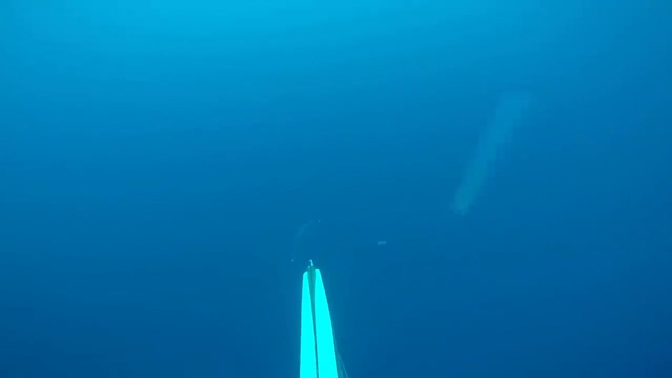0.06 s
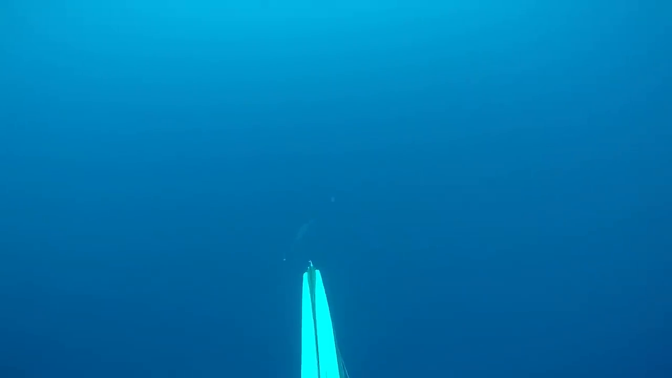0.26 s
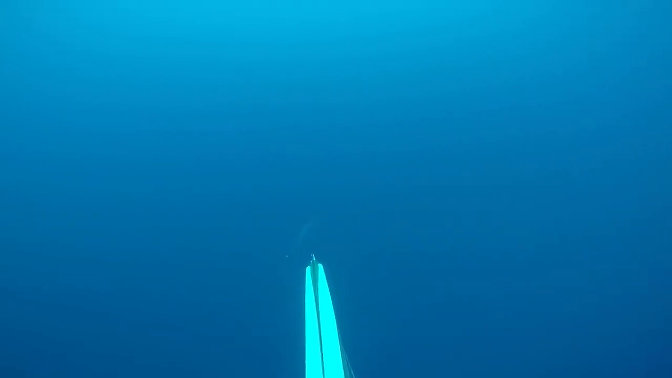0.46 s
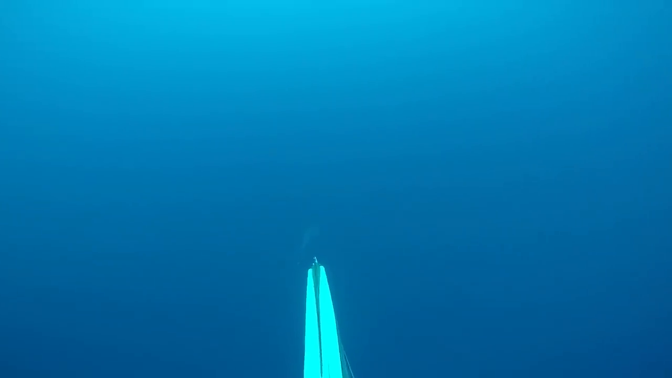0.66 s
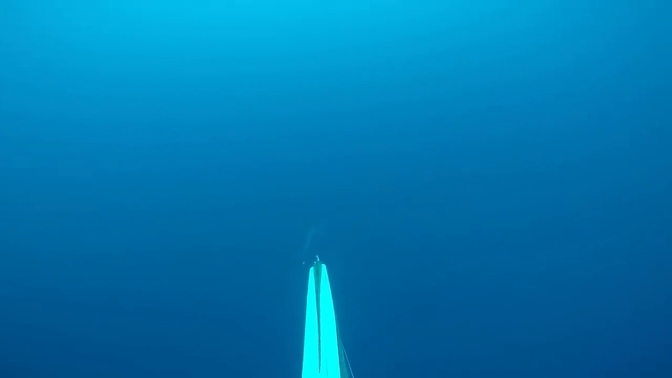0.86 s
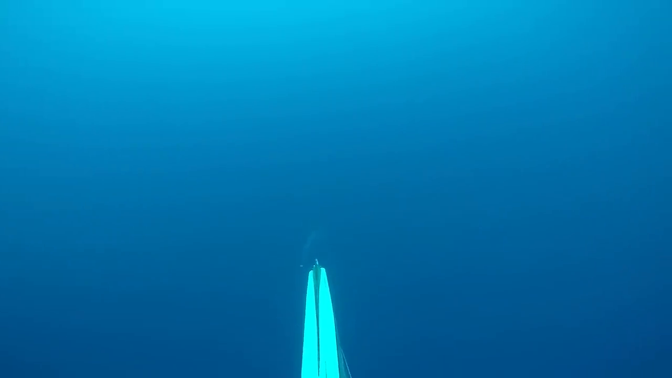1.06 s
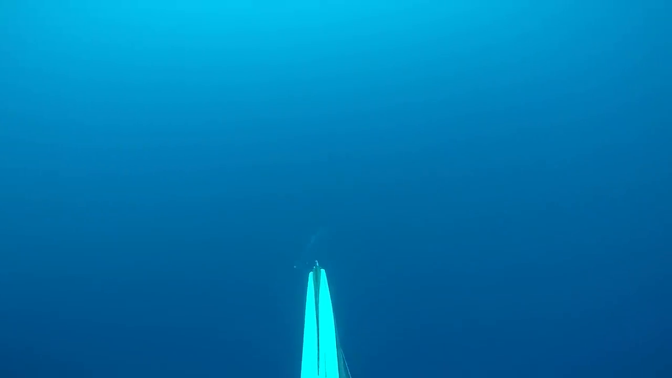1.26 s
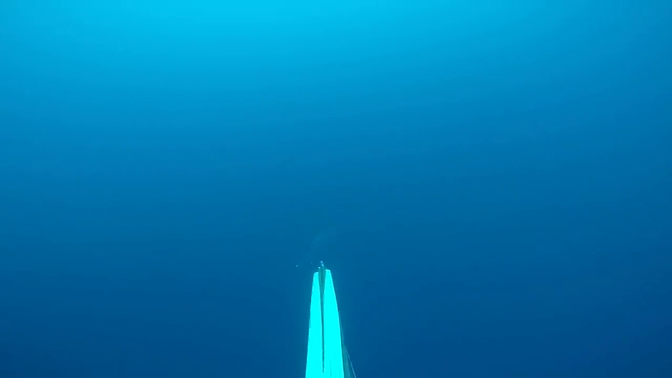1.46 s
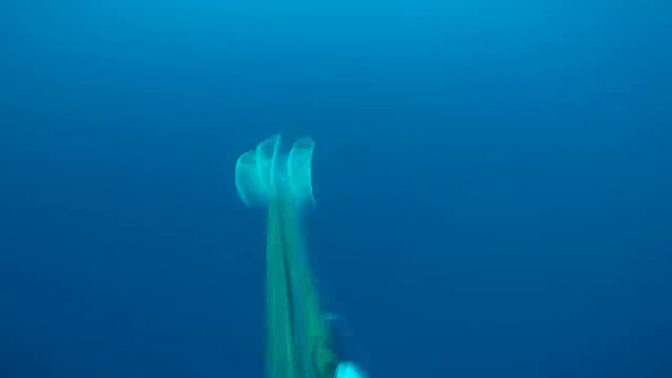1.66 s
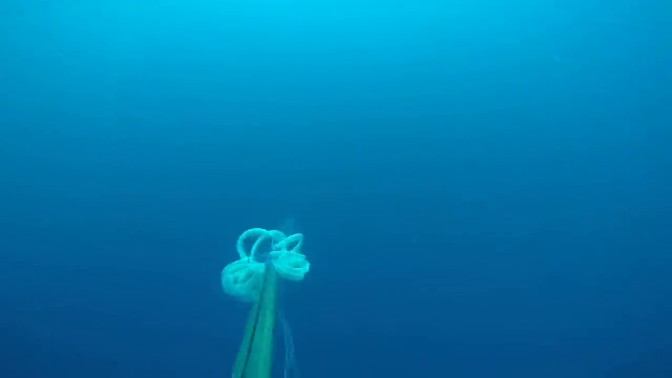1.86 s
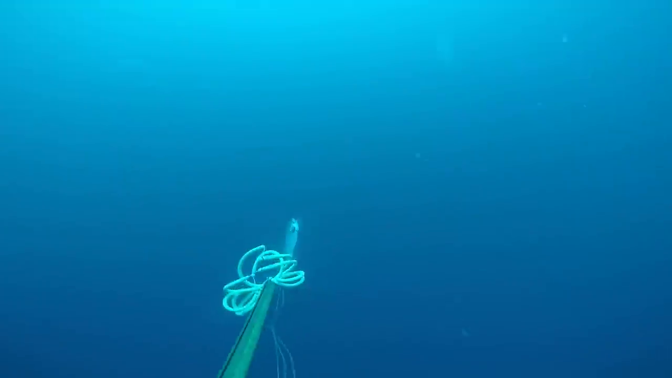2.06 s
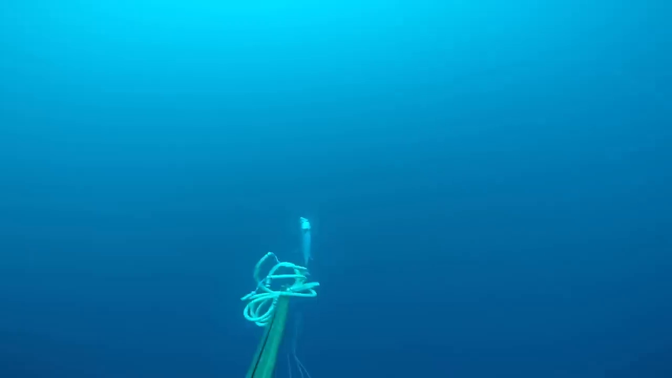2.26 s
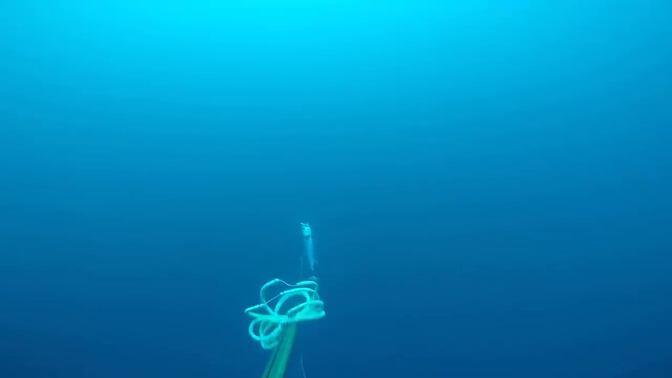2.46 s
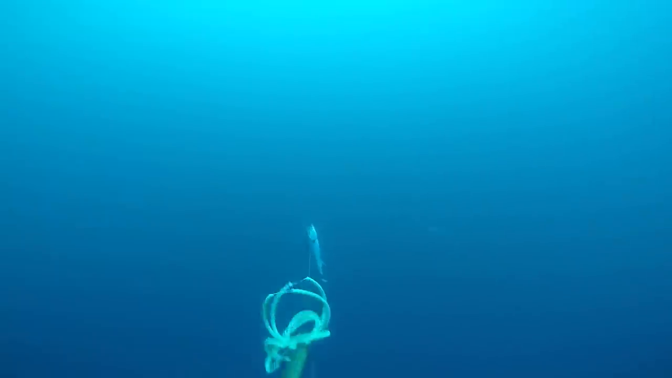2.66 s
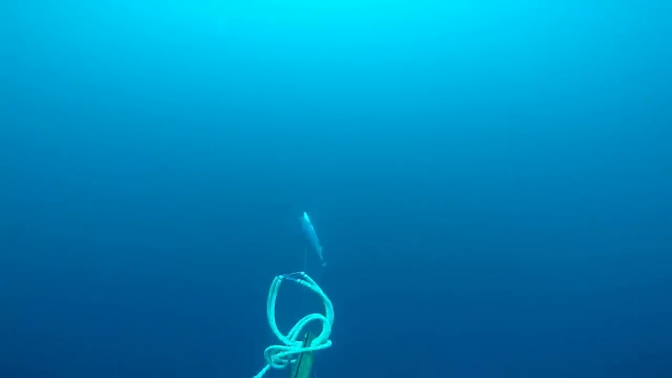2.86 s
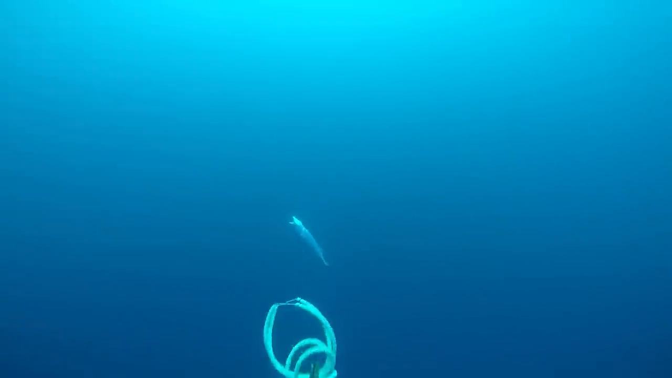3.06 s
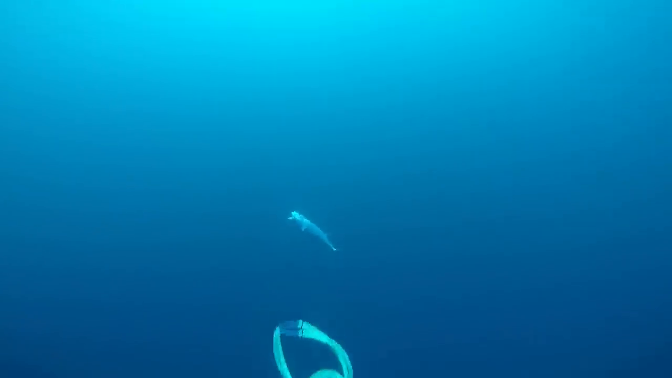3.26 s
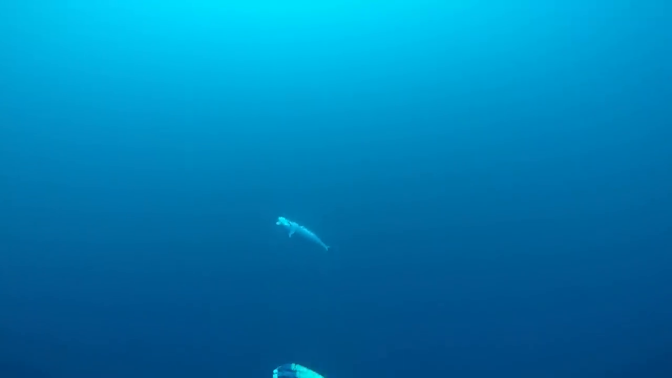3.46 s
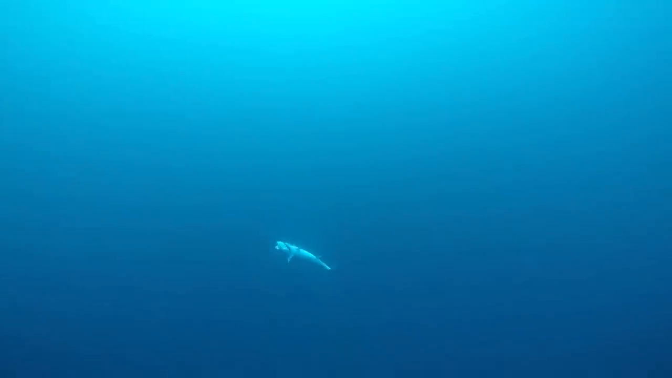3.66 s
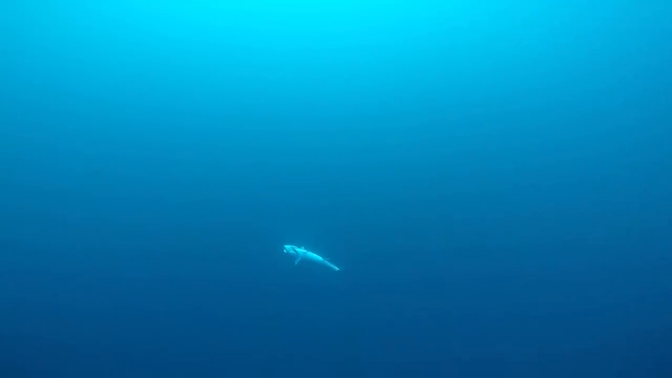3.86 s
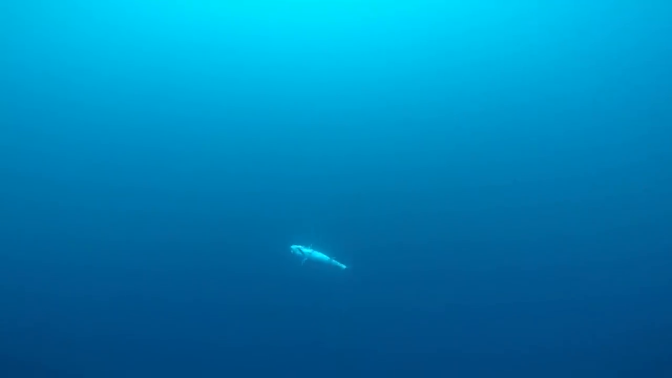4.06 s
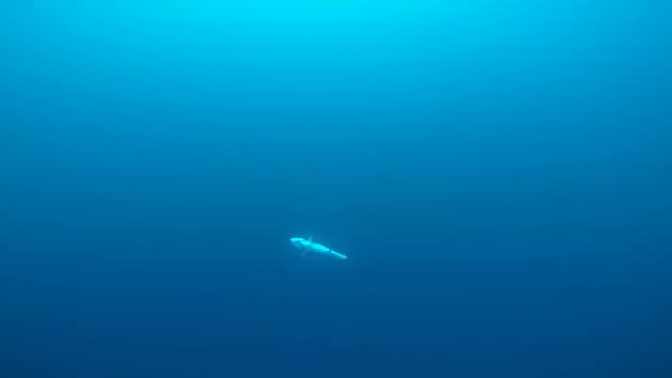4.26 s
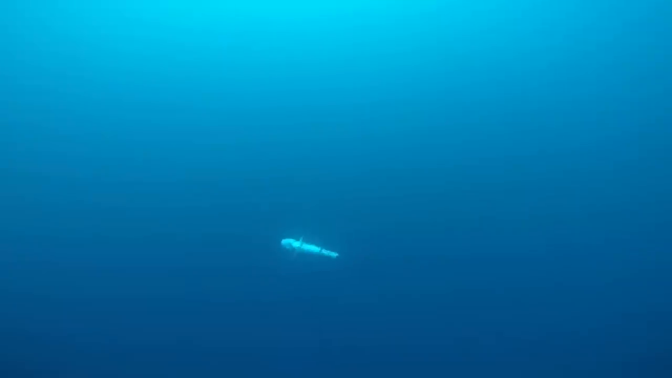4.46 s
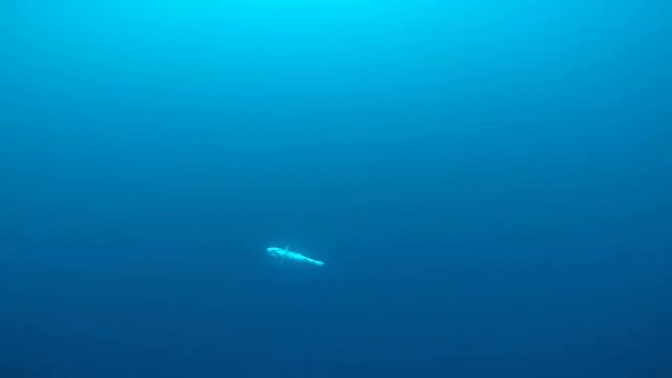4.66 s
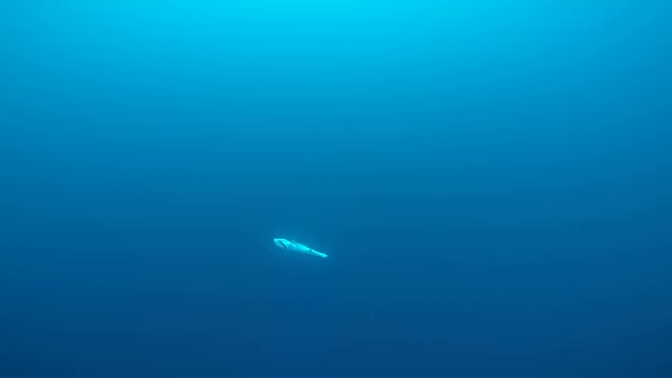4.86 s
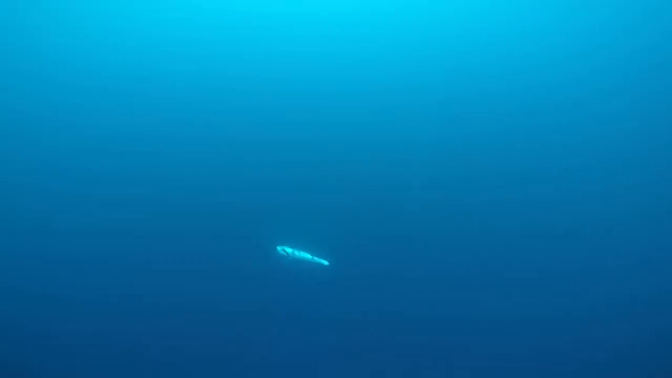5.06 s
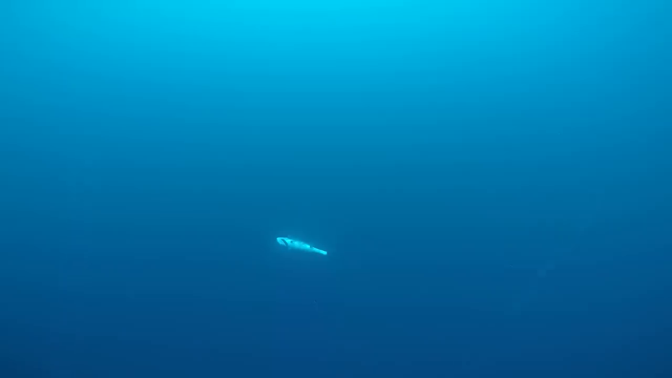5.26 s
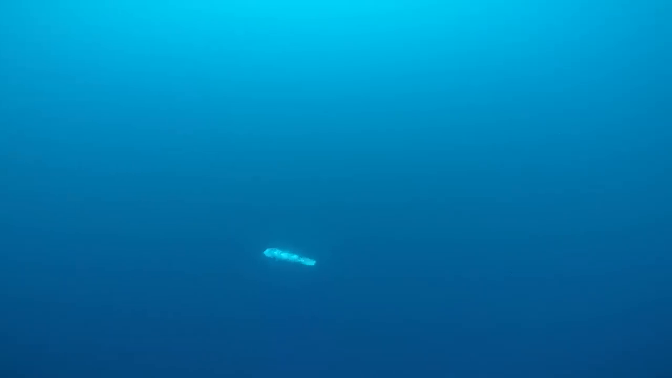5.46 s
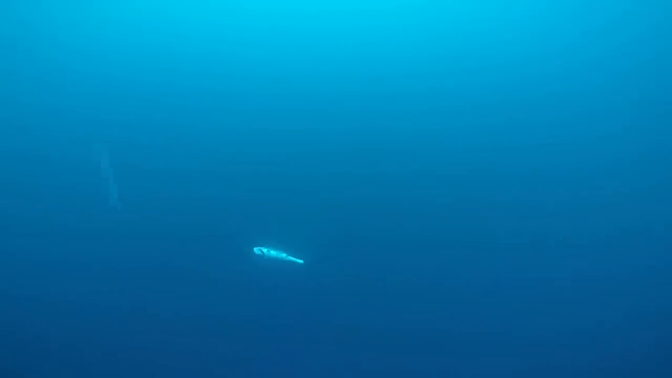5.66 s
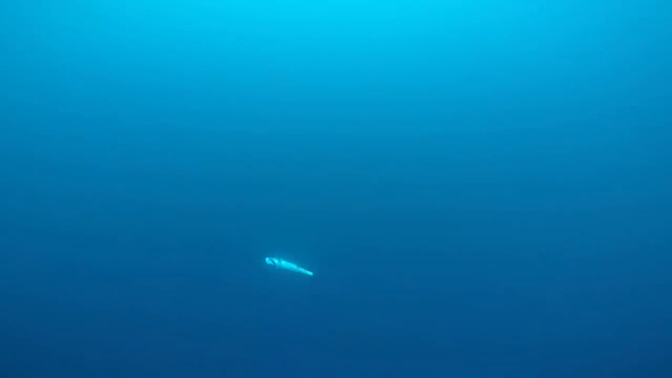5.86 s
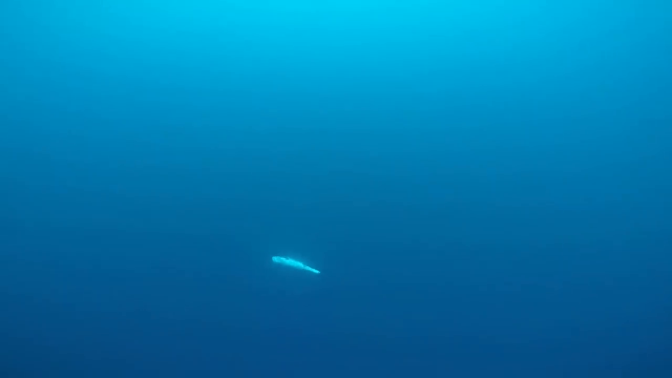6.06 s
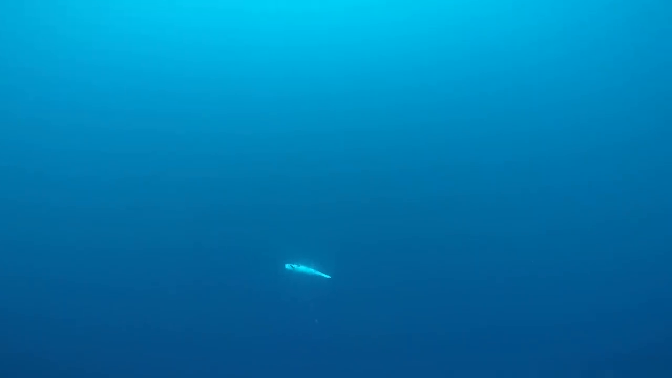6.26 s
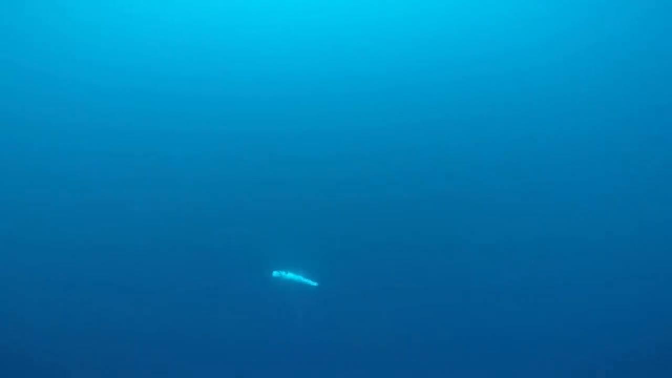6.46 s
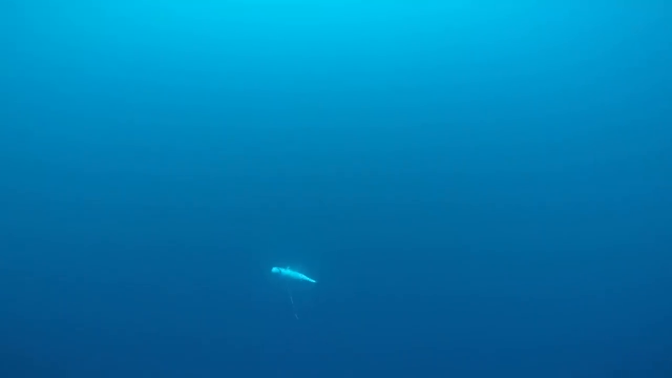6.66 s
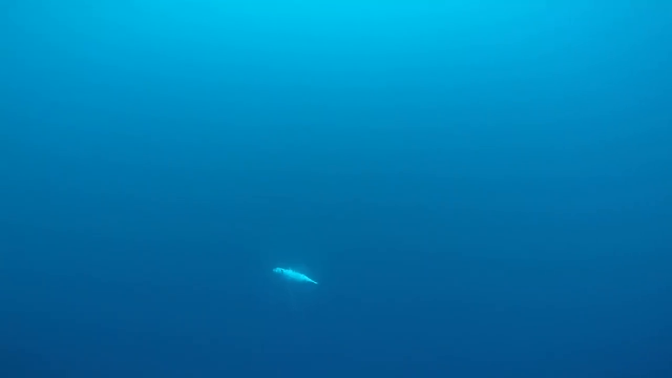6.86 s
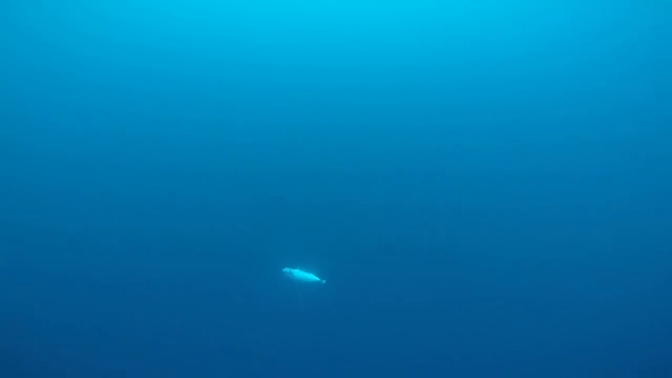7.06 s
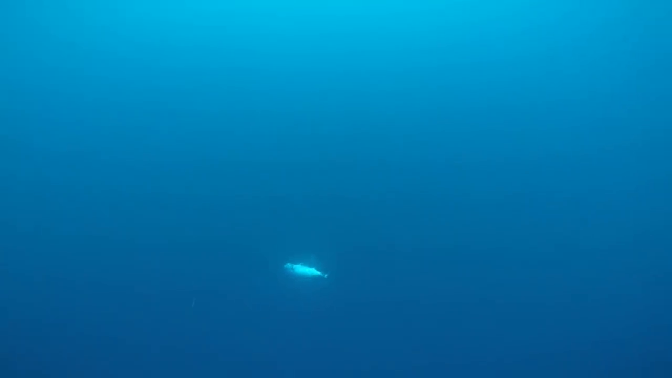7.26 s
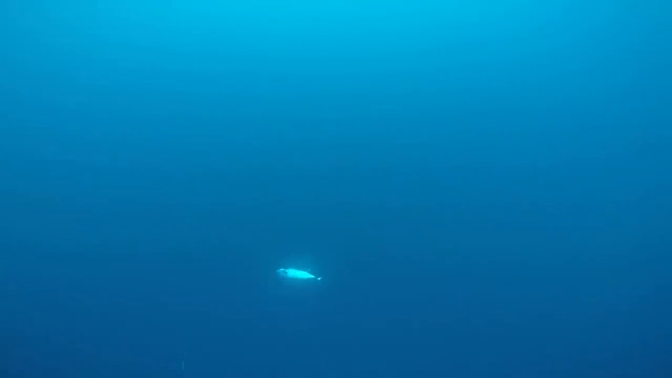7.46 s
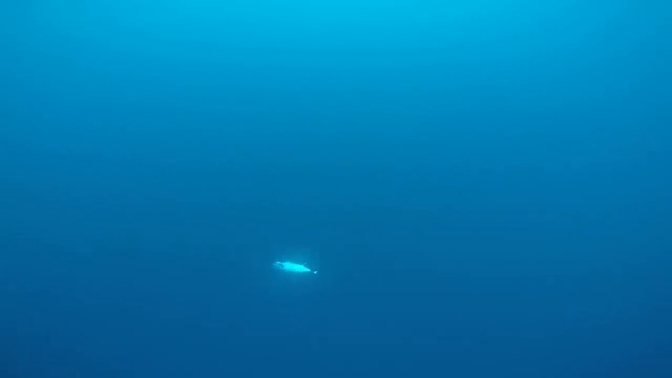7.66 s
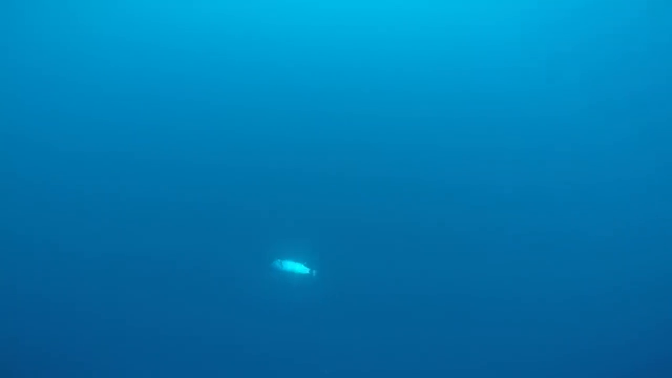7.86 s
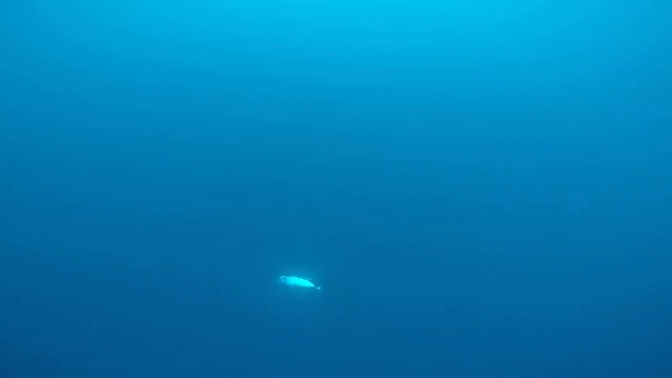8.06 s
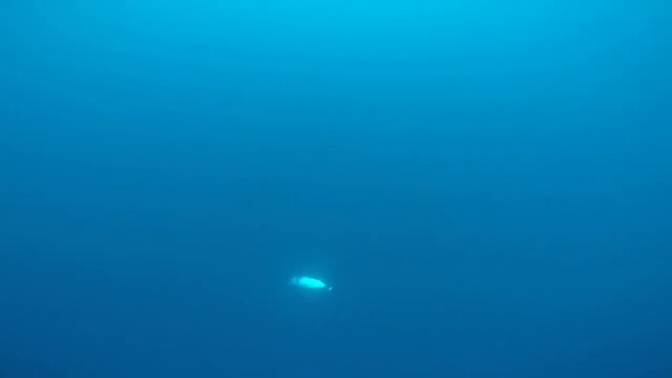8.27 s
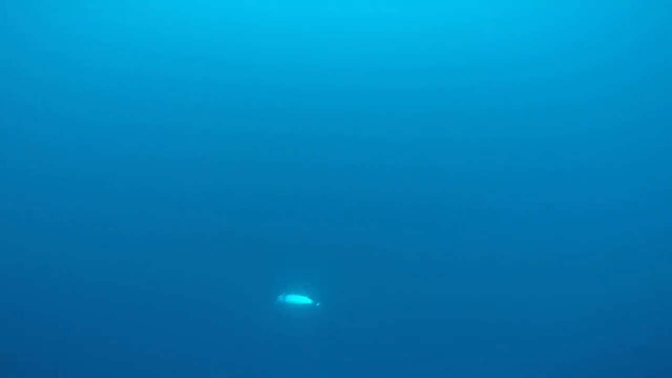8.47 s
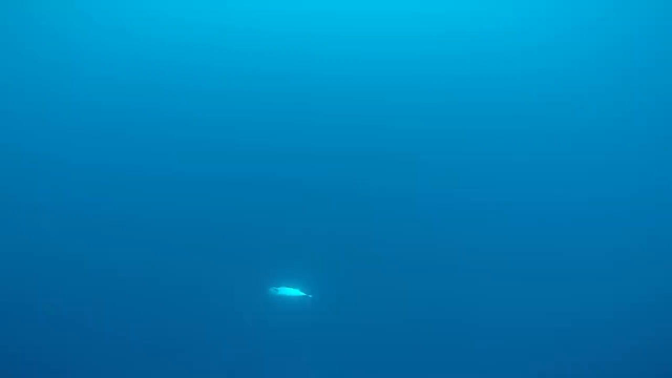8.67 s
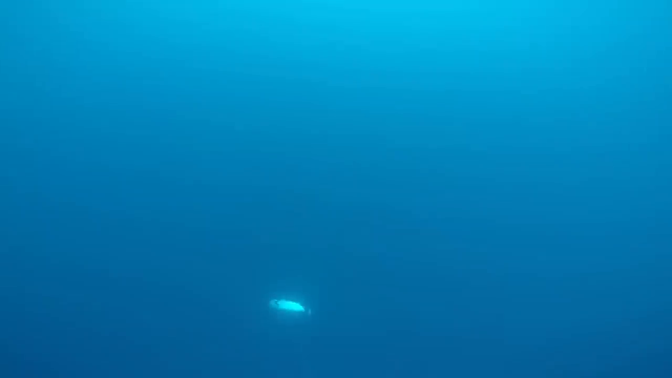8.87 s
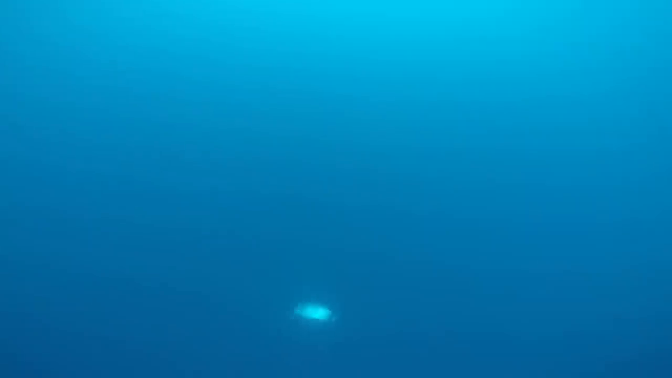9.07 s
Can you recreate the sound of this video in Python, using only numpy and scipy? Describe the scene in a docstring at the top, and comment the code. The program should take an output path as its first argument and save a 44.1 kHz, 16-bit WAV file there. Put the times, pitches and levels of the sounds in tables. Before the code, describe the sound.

Steady crackling underwater hiss with soft glugs; a sudden sharp clanking speargun shot with deep thump ducks everything, then swishes and bubbles return.

```python
"""Snapping shrimp crackle and hiss over a dull sea murmur, heard by a camera in a case on a diver.
Water rumbles and swishes past (shaped noise), trapped air glugs (bursts that ring resonances) and thin tones squeak.
Then a speargun fires: hard contacts and scraping ring the metal, low swinging tones give the recoil.
A churning, fizzing wake follows, and later brief low swells.
The loud shot makes the gain control turn everything down, then up again steadily."""
import sys
import numpy as np
from scipy import signal
from scipy.fft import rfft, irfft
from scipy.io import wavfile
from scipy.ndimage import uniform_filter1d

SR = 44100
rng = np.random.default_rng(int(sys.argv[2]) if len(sys.argv) > 2 else 0)


def output_pcm(signal):
    """Save a mono or channel-first signal as 16-bit PCM at the path in sys.argv[1].

    Samples are clipped to [-1, 1] before scaling.
    """
    pcm = np.clip(np.atleast_2d(signal).T, -1, 1) * 32767
    wavfile.write(sys.argv[1], SR, np.round(pcm).astype(np.int16))


N = 402191  # length of the scene in samples
SHOT_S = 1.629  # the spear starts to move


def undb(db):
    """Turn decibels into a gain."""
    return 10 ** (np.asarray(db) / 20)


def unit(x):
    """Scale a sound to an average (rms) strength of 1."""
    return x / np.sqrt(np.mean(x ** 2) + 1e-18)


def curve(rows):
    """Join the points of a (time, value) table by straight lines."""
    times, values = np.transpose(rows)
    return np.interp(np.arange(N) / SR, times, values)


def add(out, start_s, x):
    """Mix the sound x into out from a given time."""
    i = max(int(start_s * SR), 0)
    out[i:i + len(x)] += x[:len(out) - i]


def envelope(t, attack, hold, release):
    """Straight rise, full strength until the hold time is over, exponential fall; all in seconds."""
    rise = np.clip(t / attack, 0, 1)
    return rise * np.exp(-np.maximum(t - hold, 0) / release)


def colour(x, points, tilt_db=0):
    """Shape the spectrum of x by (pitch, level) points plus a tilt in dB per octave."""
    octave = np.log2(np.fft.rfftfreq(len(x), 1 / SR) + 1)
    hz, db = np.transpose(points)
    gain = undb(np.interp(octave, np.log2(hz), db) + tilt_db * octave)
    return irfft(rfft(x) * gain, len(x))


def ring(push, modes):
    """Fading resonances, each driven by the push near its own pitch; dB sets the energy of each."""
    t, out = np.arange(len(push)) / SR, 0
    for hz, db, t60 in modes:
        near = signal.lfilter(*signal.iirpeak(hz, 1, SR), push)
        mode = np.cos(2 * np.pi * hz * t) * np.exp(-np.log(1000) * t / t60)
        ringing = signal.fftconvolve(near, mode)[:len(t)]
        out = out + undb(db) * unit(ringing)
    return out


def grains(rate, spread_db):
    """Random clicks of widely varying size, at an average rate per second."""
    size = undb(spread_db * np.minimum(rng.standard_normal(N), 2.6))  # the cap limits extreme clicks
    happens = rng.random(N) < rate / SR
    return unit(happens * size * rng.choice([-1, 1], N))


def walk(rate):
    """Smooth random drift of rms 1, with a new target value `rate` times a second."""
    k = int(SR / rate)
    steps = np.repeat(rng.standard_normal(N // k + 1), k)
    return unit(uniform_filter1d(steps, k)[:N])


# Resonances of the case walls, levels relative to each other.
# Columns: pitch_hz, width_hz, level_db
CASE_MODES = [(1720, 175, -12), (2078, 201, -2), (2454, 370, -1), (3194, 178, -3), (3589, 190, 2.5),
              (4247, 216, -2), (5290, 570, -4.5), (6300, 240, -8), (6640, 560, -9), (8204, 580, -7.5),
              (9870, 950, -10.5), (12640, 1550, -16.5), (14300, 1330, -14.5)]


def housing(x):
    """Sound from the sea passes the case: its walls resonate and the low end is lost."""
    walls = 0
    for k, (hz, width, db) in enumerate(CASE_MODES):
        wall = signal.lfilter(*signal.iirpeak(hz, hz / width, SR), x)
        walls = walls + (-1) ** k * undb(db) * wall  # neighbours have opposite signs
    return signal.sosfilt(signal.butter(4, 1500, "high", fs=SR, output="sos"), walls)


# Level of the constant bed of shrimp sound. Columns: time_s, level_db
SHRIMP_LEVEL = [(0, -44), (1.6, -45.5), (3.5, -43), (9.1, -42.5)]
# The nearest single snaps; level is before near_db, treble is relative to the dull part.
# Columns: start_s, level_db, treble_db
NEAR_SNAPS = [(2.744, -27, -30), (3.253, -30.5, -12), (3.4755, -30.5, -22), (4.091, -30, -16),
              (4.4239, -29.5, -19), (5.225, -30.5, -24), (5.3668, -26.5, -23), (6.356, -29, -7),
              (6.375, -28.5, -3), (6.757, -29, -15), (7.1776, -29.5, -16), (8.064, -30.5, -16),
              (8.266, -27, -18)]


def shrimp(far_db=-2, scatter_db=-3, scatter_s=0.00067, near_db=-9.5, echo=0.16, echo_s=0.0025):
    """Countless far snaps merge to hiss; nearer ones crackle, each smeared by scattered paths."""
    snaps = grains(rate=1100, spread_db=7.5)
    smear = np.sqrt(signal.lfilter([1], [1, -np.exp(-1 / (scatter_s * SR))], snaps ** 2))
    hiss = (undb(far_db) + undb(scatter_db) * unit(smear)) * rng.standard_normal(N)
    out = unit(housing(snaps + hiss)) * undb(curve(SHRIMP_LEVEL))
    t = np.arange(SR // 100) / SR
    dull_filter = signal.butter(4, 4800, fs=SR, output="sos")
    for start_s, level_db, treble_db in NEAR_SNAPS:
        echoes = echo * rng.standard_normal(len(t)) * np.exp(-t / echo_s)
        snap = housing((t == 0) + echoes)
        dull = unit(signal.sosfilt(dull_filter, snap))
        bright = unit(np.diff(snap, prepend=0))
        add(out, start_s, undb(level_db + near_db) * unit(dull + undb(treble_db) * bright))
    return out


# Spectrum of the dull wash of the open sea. Columns: pitch_hz, level_db (per Hz)
SEA_COLOUR = [(60, -12), (200, 1.5), (400, 1.5), (800, 1), (1300, -12.5), (2000, -10), (4000, -30)]


def wash(level_db=-61.5, drift_db=2.0):
    """The open sea murmurs faintly behind everything: shaped noise with a drifting level."""
    murmur = unit(colour(rng.standard_normal(N), SEA_COLOUR))
    return murmur * undb(level_db + drift_db * walk(7))


def wake_strength(level_db=-24, fade_s=0.27):
    """Stirred-up water starts at the shot and dies away exponentially."""
    since_shot = np.arange(N) / SR - SHOT_S
    return undb(level_db) * (since_shot > 0) * np.exp(-np.abs(since_shot) / fade_s)


# Spectrum of water pressing on the case. Columns: pitch_hz, level_db (per Hz)
PRESSURE_COLOUR = [(10, -16), (20, 1.5), (28, -6), (42, -9.5), (75, -14), (110, -21.5), (180, -27.5),
                   (400, -53)]


def surge(wake, aiming_db=-36.5, moving_db=-37.5, uneven_db=1.6):
    """Water presses on the case: low noise while the diver aims, then while he moves, plus the wake."""
    after_shot = np.arange(N) / SR > SHOT_S
    pressure = undb(np.where(after_shot, moving_db, aiming_db) + uneven_db * walk(6.8))
    rumble = unit(colour(rng.standard_normal(N), PRESSURE_COLOUR))
    return rumble * (pressure + wake)


def gurgle(modes, rate=700, wander=0.028, patchy_db=2):
    """Bubbles and eddies strike resonances that waver in pitch and strength, each on its own."""
    out = 0
    for hz, width, db in modes:
        strikes = grains(rate, spread_db=5.0) * np.exp(2j * np.pi * rng.random(N))
        swell = signal.sosfilt(signal.butter(2, width / 2, fs=SR, output="sos"), strikes)
        phase = 2 * np.pi * np.cumsum(hz * (1 + wander * walk(30))) / SR
        tone = unit((swell * np.exp(1j * phase)).real)
        out = out + tone * undb(db + patchy_db * walk(25))
    return unit(out)


# Swishes; length runs from the start to where the fall begins. Levels are before the sag.
# Columns: start_s, length_s, body_db, froth_db
SWISH_TIMES = [(0.449, 0.16, -39, -46.5), (2.82, .19, -53.5, -59.5), (3.365, 0.084, -42.5, -58),
               (3.79, 0.15, -50, -58), (3.998, 0.095, -41.5, -67), (4.198, 0.075, -58, -55),
               (4.8, 0.24, -54, -58.5), (5.223, 0.58, -34.5, -36.5), (5.993, 0.17, -50, -45),
               (7.8, 0.17, -56, -54.5), (8.619, 0.14, -46, -49), (8.784, 0.12, -42.5, -38)]


def flow(attack_s=0.053, froth_attack_share=.45, release_s=0.071, sag_db_per_s=7.5):
    """Strength of body and froth: a constant trickle plus swishes that build, sag and die away."""
    t = np.arange(N) / SR
    body, froth = undb(-61.5) ** 2, undb(-65) ** 2  # the faint trickle, as power
    for start_s, length_s, body_db, froth_db in SWISH_TIMES:
        since = t - start_s
        sag_db = sag_db_per_s * np.maximum(since, 0)
        body_shape = envelope(since, attack_s, length_s, release_s)
        # froth needs speed, so its rise follows the length of the swish
        froth_shape = envelope(since, froth_attack_share * length_s, length_s, release_s)
        body = body + (undb(body_db - sag_db) * body_shape) ** 2
        froth = froth + (undb(froth_db - sag_db) * froth_shape) ** 2
    return np.sqrt(body), np.sqrt(froth)


# Resonances of the gurgling flow, then of its froth; levels relative to each other.
# Columns of both: pitch_hz, width_hz, level_db
FLOW_MODES = [(155, 110, -9.5), (259.3, 70, 0.5), (333.3, 101, -2.5), (454, 140, -8)]
BUBBLE_MODES = [(687, 103, -7), (783, 85, -1), (960, 245, -5.5), (1153, 220, -10), (1710, 790, -12)]


def passing_water(wake, churn_db=-14):
    """Flow gurgles and froths along the case, and the wake churns its lower part."""
    body_flow, froth_flow = flow()
    body = gurgle(FLOW_MODES) * (body_flow + undb(churn_db) * wake)
    return body + gurgle(BUBBLE_MODES) * froth_flow


# Resonances of trapped air: level before weighting, and time to fade by 60 dB for a full-size glug.
# Columns: pitch_hz, level_db, t60_s
AIR_RESONANCES = [(80.6, -39, .14), (134, 12, 0.13), (215, 1, 0.22), (242, 1.5, 0.1), (311.4, 2.5, 0.042),
                  (386, 0, 0.05), (416.3, -8, 0.1), (559, 4, 0.058), (647, 0.5, 0.067), (715, 10, 0.041),
                  (780, -20, 0.1), (890, -47, 0.067), (930, -48, 0.1), (1203, 18.5, 0.017),
                  (1580, 9, 0.013)]
# Glugs; level is before gain_db, mid weights the upper modes, splash and tick are relative levels.
# Columns: start_s, level_db, mid_db, splash_db, tick_db, pitch_hz
AIR_GLUGS = [(0.044, -36, -10.5, -10.5, -10.5, 404), (0.109, -44.5, 10.5, -2, -15, 791),
             (0.462, -28.5, 10, -7, -11, 756), (0.471, -15.5, -5.5, -16.5, -30, 684),
             (2.971, -31.5, -11, -25, -13, 261), (3.005, -42, 5, -20, -20, 151),
             (3.44, -29.5, -30, -27, -27, 261), (3.503, -26, -16, -20, -27, 151),
             (3.62, -13.5, -12.5, -45, -22, 115), (3.97, -6.5, -10.5, -43, -21, 231),
             (4.63, -27.5, -3.5, -22, -1.5, 353), (4.778, -26.5, -17, -29, -22, 412),
             (4.843, -41, 2, -8, -10, 161), (5.113, -29.5, -8, -31, -28, 172),
             (6.278, -36.5, -19, -19, -20, 409), (6.425, -34.5, -22, -30, -22, 406),
             (7.105, -40, -20, -30, -22, 210), (7.94, -29, -20, -33, -25, 369),
             (8.174, -27, -17, -36, -29, 237), (8.184, -30, -1.5, -21, -23, 215),
             (8.31, -37, -4, -13, 0, 154), (8.359, -29.5, -28, -32, -11, 207),
             (8.936, -8, -22, -36, -42, 250)]


def glugs(gain_db=-19, growth=0.37, full_db=-9, dull_hz=940, slosh_db=-7, slosh_s=0.022,
          thin_db=9, tick_s=0.023, tick_hz=2500, kick_db=-4, burst_s=.01):
    """A pocket of air shifts in a burst, ticks on the case, sloshes and rings; louder ones ring longer."""
    out, t = np.zeros(N), np.arange(SR // 3) / SR
    water_mass = signal.ellip(8, 1, 60, dull_hz, fs=SR, output="sos")
    splash_band = signal.butter(3, [dull_hz, 1700], "band", fs=SR, output="sos")
    soft_contact = signal.butter(3, tick_hz, fs=SR, output="sos")
    mode_hz, mode_db, t60 = np.transpose(AIR_RESONANCES)
    registers = np.log([110, 200, 450, 600])  # boom, two unweighted points, mid; in Hz
    for start_s, level_db, mid_db, splash_db, tick_db, pitch_hz in AIR_GLUGS:
        size = undb(growth * (level_db - full_db))
        slosh = undb(slosh_db) * np.exp(-t / (slosh_s * size))
        push = rng.standard_normal(len(t)) * (np.exp(-(t / burst_s) ** 2) + slosh)
        kick = undb(kick_db) * np.sqrt(np.sum(push ** 2))
        push = push + (t == 0) * kick  # the pocket breaks loose with a kick
        boom_db = -14.5 + 7 * np.log2(200 / pitch_hz)  # 7 dB more for each octave lower
        weight_db = np.interp(np.log(mode_hz), registers, [boom_db, 0, 0, mid_db])
        # octaves under the pocket's own pitch, where the ring is thinned
        below = np.maximum(np.log2(min(pitch_hz, 400) / mode_hz), 0)
        air = ring(push, zip(mode_hz, mode_db + weight_db - thin_db * below, t60 * size))
        fullness = np.sqrt(1 + undb(2 * mid_db) + undb(2 * boom_db))
        glug = unit(signal.sosfilt(water_mass, air)) * fullness
        splash = unit(signal.sosfilt(splash_band, air)) * undb(splash_db)
        case_push = housing(push * np.exp(-t / tick_s))
        tick = unit(signal.sosfilt(soft_contact, case_push)) * undb(tick_db)
        add(out, start_s, (glug + splash + tick) * undb(level_db + gain_db))
    return out


# Thin squeaks; pitches and level are those before waver and flutter.
# Columns: start_s, length_s, start_hz, middle_hz, end_hz, level_db
THIN_SQUEAKS = [(.85, 0.69, 880, 890, 820, -63.5), (1.32, 0.092, 1670, 1860, 1620, -45),
                (5.546, .13, 2400, 3150, 3000, -42.5)]


def squeaks(waver=0.027, flutter_db=4.5):
    """Faint whistles: sine tones that bend through three pitches, waver and flutter."""
    out = np.zeros(N)
    for start_s, length_s, start_hz, middle_hz, end_hz, level_db in THIN_SQUEAKS:
        n = int(length_s * SR)
        bend = np.polyfit([-1, 0, 1], [start_hz, middle_hz, end_hz], 2)
        hz = np.polyval(bend, np.linspace(-1, 1, n)) * (1 + waver * walk(400)[:n])
        loudness = undb(level_db + flutter_db * walk(119)[:n]) * np.sqrt(np.hanning(n))
        add(out, start_s, loudness * np.sin(2 * np.pi * np.cumsum(hz) / SR))
    return out


# Ring of the steel spear and the barrel, with the time to fade by 60 dB; levels relative to each other.
# Columns: pitch_hz, level_db, t60_s
STEEL_MODES = [(494, -13.5, 0.075), (680, -9, .03), (820, -2, .035), (1645, -16, 0.065), (2030, -8, 0.037),
               (2070, -8, 0.065), (2510, -12, 0.077), (2510, 1.5, 0.034), (3200, -13, 0.036),
               (3580, -1.5, 0.024), (4450, -5.5, 0.016), (5450, -9, .02), (6490, -6.5, 0.011),
               (7430, -20, 0.0113)]
# Spectrum of the scraping itself. Columns: pitch_hz, level_db (per Hz)
SCRAPE_COLOUR = [(150, 0.5), (450, -12.5), (750, -1), (1200, -20.5), (1700, -13.5), (2350, -3.5),
                 (2950, -18), (3550, -6.5), (4800, -28), (6800, -21), (8300, -32.5), (11000, -40.5),
                 (15000, -47)]


def rub(force, tilt_db, ring_db=-9, grit_db=2):
    """Gritty friction that follows a force and rings the spear and the barrel."""
    grit = undb(grit_db) * grains(rate=700, spread_db=4.5)[:len(force)]
    friction = rng.standard_normal(len(force)) + grit
    scrape = unit(colour(friction, SCRAPE_COLOUR, tilt_db)) * force
    ringing = undb(ring_db) * unit(ring(scrape, STEEL_MODES))
    return unit(unit(scrape) + ringing) * np.sqrt(np.mean(force ** 2))


# Hard contacts: the sear lets go, the wishbone rattles to the muzzle, the line snaps taut.
# Levels are before gain_db. Columns: start_s, level_db, decay_s, treble_db_per_octave
HARD_CONTACTS = [(1.6243, -9, 0.0027, 1), (1.6254, 21.5, .002, 4.5), (1.628, 20, 0.0012, -0.5),
                 (1.6456, 21, .004, -1), (1.651, 21.5, 0.0028, 0), (1.657, 15, 0.0027, -4),
                 (1.6616, 6, 0.001, 5), (1.678, 5, .0017, -3.5), (1.7886, -9, 0.006, 3.5),
                 (1.818, -19, 0.0061, 9.5), (2.1043, -21.5, 0.0018, 7), (2.14, -12.5, 0.0025, 12.5)]
# Recoil and flapping rubber bands; levels are before gain_db.
# Columns: start_s, level_db, start_hz, end_hz, rise_s, decay_s, roughness (0-1)
LOW_THUMPS = [(1.628, 21, 56.3, 19.5, 0.0052, 0.049, 0.02), (1.627, 3, 247, 210, 0.0027, 0.034, 0.55),
              (1.631, 14.5, 78, 87, 0.0056, 0.024, 0.37), (1.68, -6, 140, 125, 0.019, 0.036, 0.85),
              (1.777, -4.5, 161, 135, 0.0176, 0.032, 0.54), (1.787, -12, 230, 210, 0.002, 0.028, 0.8)]


def speargun(gain_db=-3, contact_rise_s=0.000495, rail_run_s=.029, line_attack_s=.07):
    """The sear cracks, the spear scrapes ever faster down the rail, the gun recoils, slack bands flap."""
    out, t = np.zeros(N), np.arange(SR) / SR
    for start_s, level_db, decay_s, tilt_db in HARD_CONTACTS:
        force = envelope(t, contact_rise_s, contact_rise_s, decay_s)
        add(out, start_s, undb(level_db) * rub(force, tilt_db))
    speed = np.minimum(t / rail_run_s, 1)
    rail = speed * envelope(t, rail_run_s / 2, rail_run_s, 0.0031)
    add(out, SHOT_S, undb(16.5) * rub(rail, tilt_db=-1))
    # the barrel rattles on after the spear has left, then settles
    rattle = envelope(t, contact_rise_s, rail_run_s, .02)
    add(out, SHOT_S, undb(-3) * rub(rattle, tilt_db=1.5))
    # the spear draws the line out behind it
    line = envelope(t, line_attack_s, line_attack_s, 0.06)
    add(out, SHOT_S, undb(-19.5) * rub(line, tilt_db=-1.5))
    for start_s, level_db, start_hz, end_hz, rise_s, decay_s, rough in LOW_THUMPS:
        # the swing settles against the drag of the water
        hz = end_hz + (start_hz - end_hz) * np.exp(-t / .02)
        wobble = 1 + rough * (walk(120.5) + 1j * walk(110))[:len(t)]
        swing = (wobble * np.exp(2j * np.pi * np.cumsum(hz) / SR)).imag
        add(out, start_s, -undb(level_db) * envelope(t, rise_s, rise_s, decay_s) * swing)
    return out * undb(gain_db)


# Spectrum of the fizzing wake. Columns: pitch_hz, level_db (per Hz)
WAKE_COLOUR = [(150, -8), (400, 0.5), (900, -5.5), (1500, -8), (2500, -5), (6000, -37)]


def fizz(wake, level_db=-9):
    """Many tiny clicks make the wake fizz as it fades."""
    return unit(colour(grains(rate=2600, spread_db=-3.5), WAKE_COLOUR)) * undb(level_db) * wake


# Swells that rock the case. Columns: middle_s, level_db (of the swaying tone)
SWELL_TIMES = [(3.04, -32), (3.24, -32), (3.45, -34), (3.63, -32), (3.88, -29), (4.85, -26), (5.32, -30),
               (5.8, -26), (6.8, -26.5), (7.8, -31), (8.31, -32), (8.84, -29.5)]


def swells(sway_hz=28, width_s=0.045, wander=0.1515, stir_db=-3):
    """Pressure swells rock the case for a few low-pitched cycles and stir up eddies."""
    t = np.arange(N) / SR
    strength = sum(undb(db) * np.exp(-((t - middle_s) / width_s) ** 2) for middle_s, db in SWELL_TIMES)
    hz = sway_hz * (1 + wander * walk(25))
    sway = unit(np.sin(2 * np.pi * np.cumsum(hz) / SR))
    eddies = unit(colour(rng.standard_normal(N), PRESSURE_COLOUR))
    return strength * (sway + undb(stir_db) * eddies)


def scene():
    """Everything that reaches the microphone inside the case."""
    wake = wake_strength()
    sea = shrimp() + wash()
    water = surge(wake) + passing_water(wake) + fizz(wake) + swells()
    return (sea + water + glugs() + squeaks() + speargun())[None]


def record(dry, ceiling_db=-2.0, recovery_db=20.0, top_hz=15400):
    """Gain control drops at once and recovers by a steady dB per second; peaks clip, the top is cut."""
    power_db = 10 * np.log10(np.abs(uniform_filter1d(dry[0] ** 2, SR // 400)) + 1e-12)
    excess_db = np.maximum(power_db - ceiling_db, 0)
    ramp = recovery_db * np.arange(N) / SR
    cut_db = np.maximum.accumulate(excess_db + ramp) - ramp  # hold the largest cut, minus recovery
    loud = np.clip(dry * undb(-cut_db), -1, 1)
    return signal.sosfilt(signal.ellip(8, .2, 70, top_hz, fs=SR, output="sos"), loud)


dry = scene()
out = record(dry)
output_pcm(out)
```